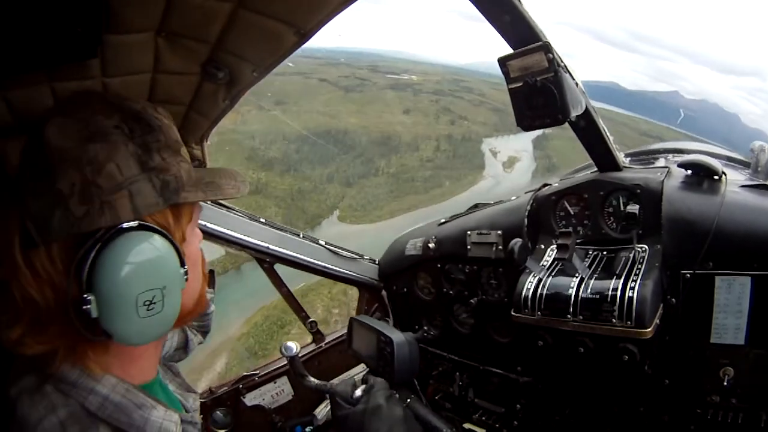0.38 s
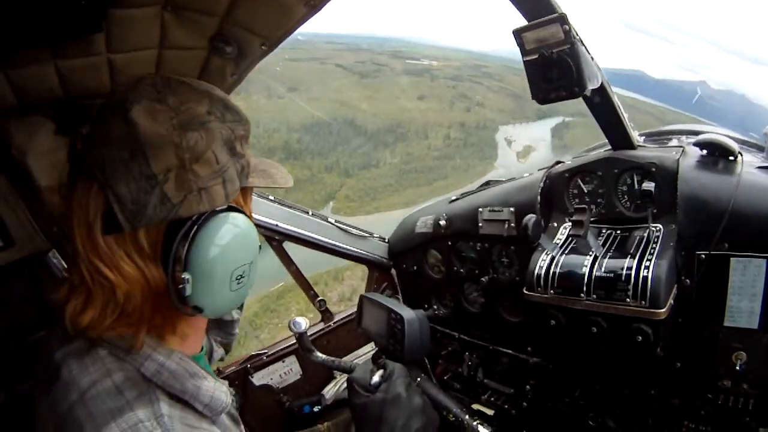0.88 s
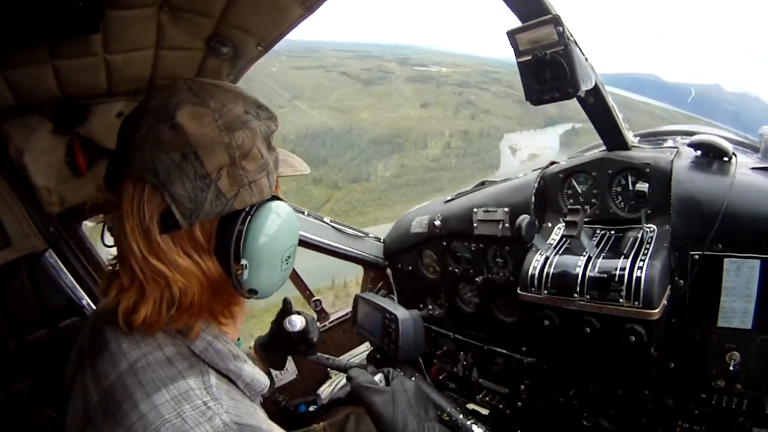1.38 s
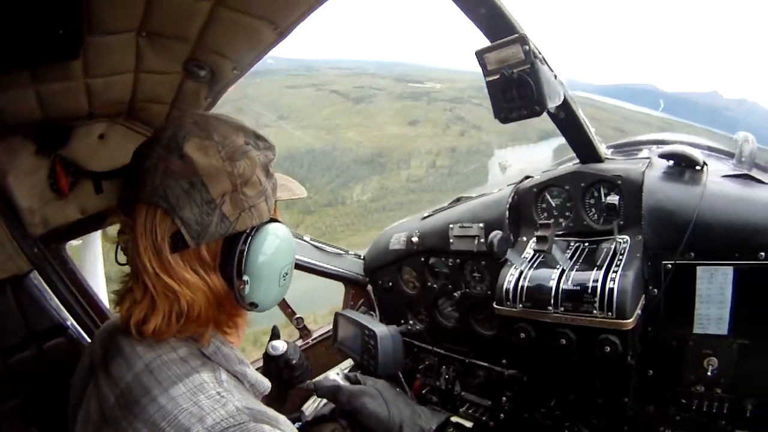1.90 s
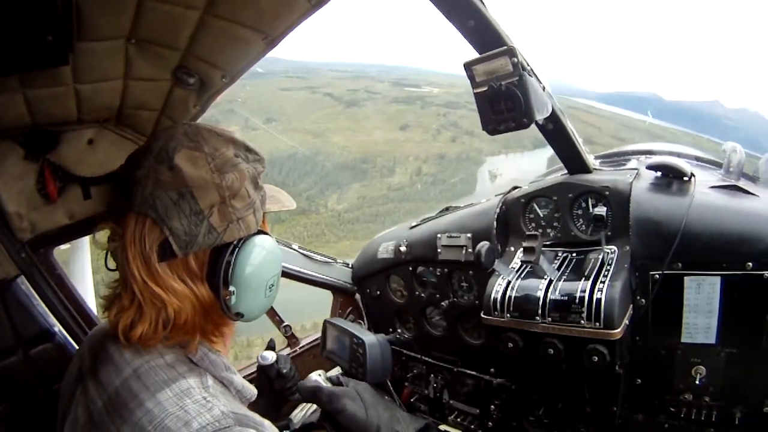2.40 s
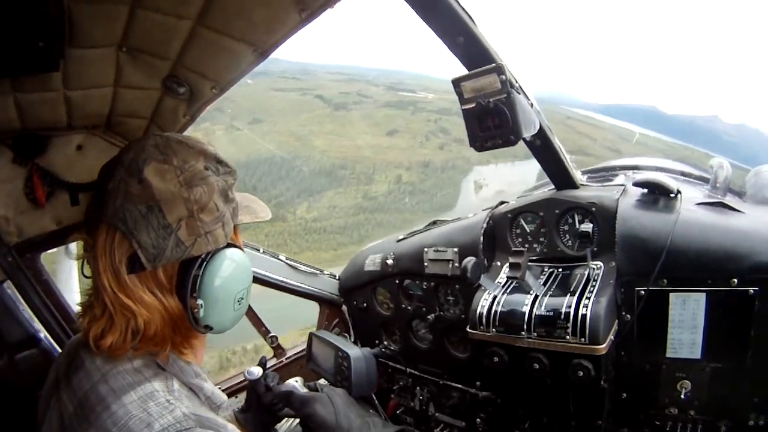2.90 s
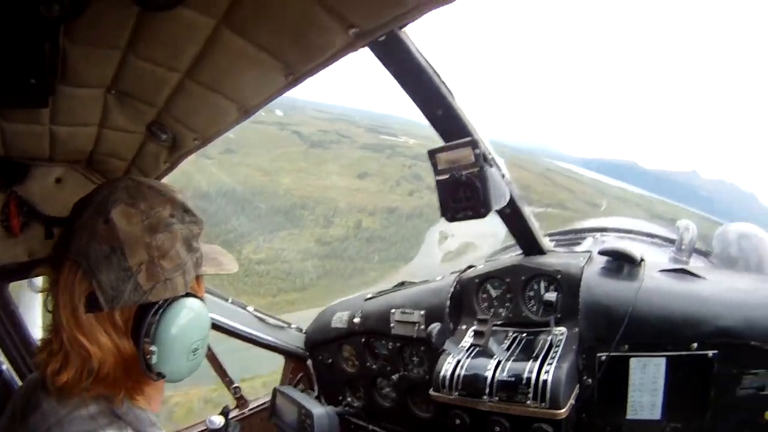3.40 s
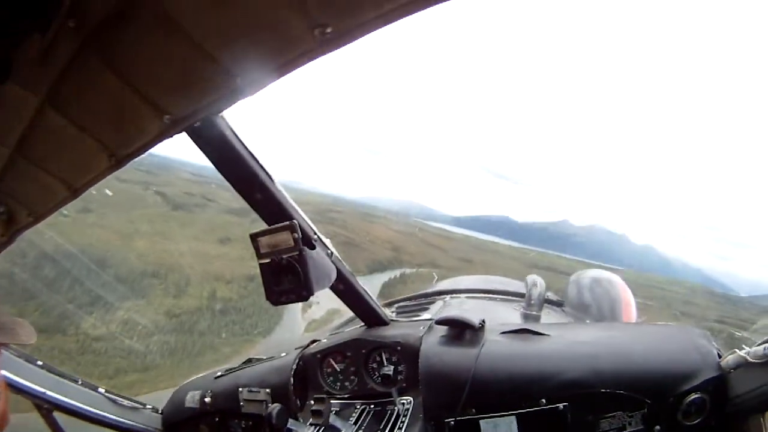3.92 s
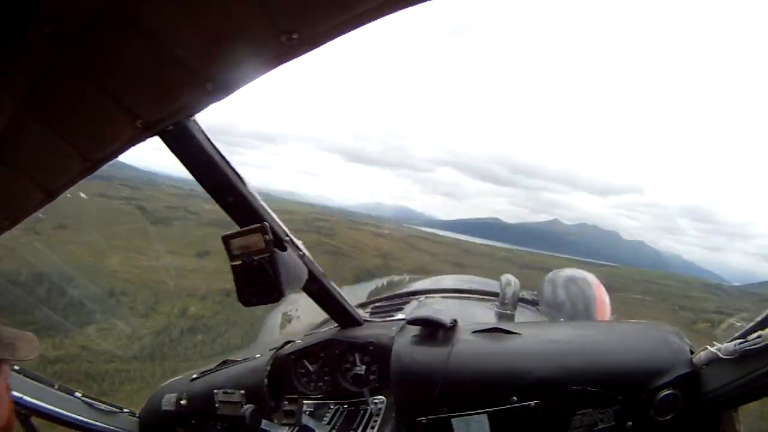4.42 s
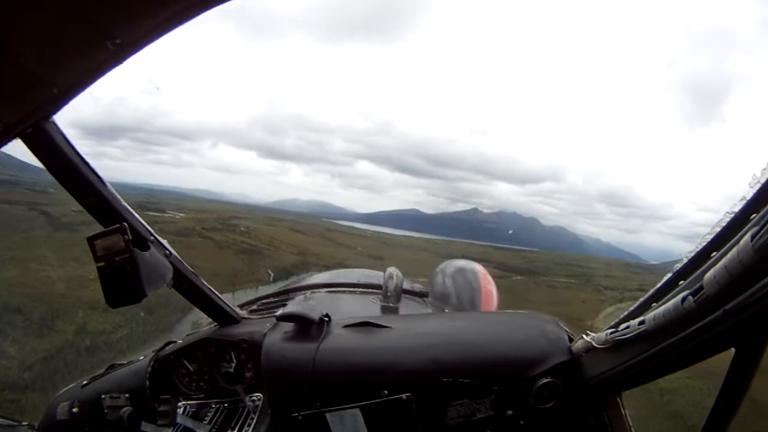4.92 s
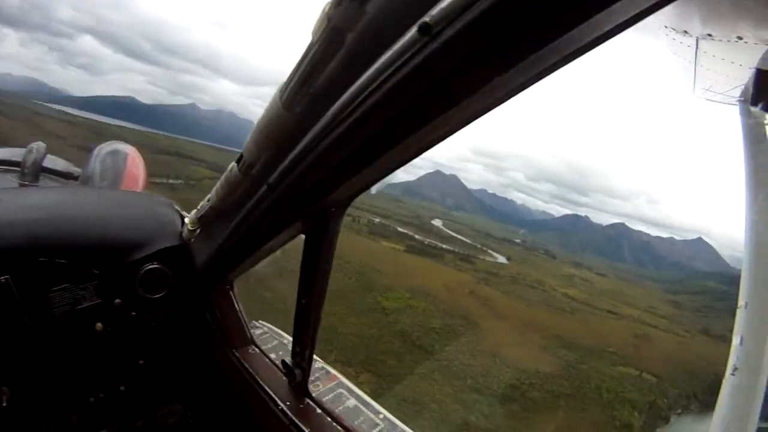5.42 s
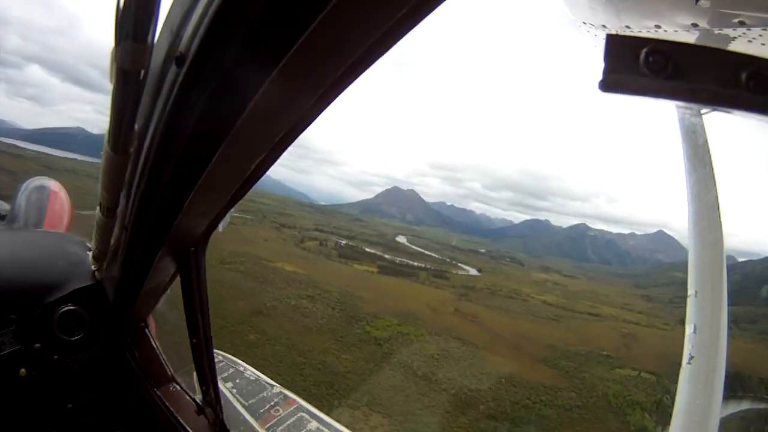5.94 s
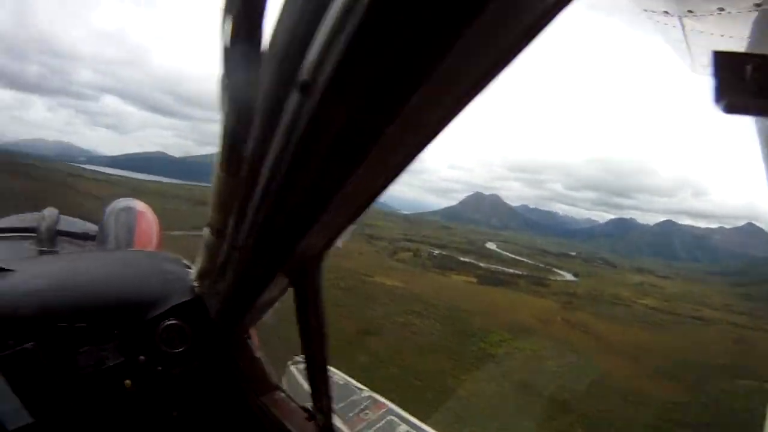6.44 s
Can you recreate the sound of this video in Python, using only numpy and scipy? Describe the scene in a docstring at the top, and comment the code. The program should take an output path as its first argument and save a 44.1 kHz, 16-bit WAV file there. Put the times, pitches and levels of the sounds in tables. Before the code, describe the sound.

Inside a small propeller plane at cruise, a rough throbbing engine roar continues under rushing air, its tone brightening as the microphone turns.

```python
"""Radial engine aircraft cabin

A nine-cylinder radial engine and its two-blade propeller drone at cruise: pulses ring in a small cabin.
Thin whines come from gears and valves, and noise makes the rumble and hiss of air past the hull.
The camera turns from the seat past the panel to the side window, which changes the balance of the sounds.
The recorder samples slowly and holds each sample, so the sound is mirrored into the treble."""
import sys
import numpy as np
from scipy import signal
from scipy.fft import rfft, irfft, next_fast_len
from scipy.io import wavfile
from scipy.ndimage import uniform_filter1d, map_coordinates

SR = 44100
rng = np.random.default_rng(int(sys.argv[2]) if len(sys.argv) > 2 else 0)


def digitize_waveform(pressure):
    """Quantize a signal to 16-bit integers and store it at the path in sys.argv[1].

    Rows of a 2-D input are taken as channels; values are limited to [-1, 1].
    """
    field = np.atleast_2d(pressure).T
    bounded = np.clip(field, -1, 1)
    quanta = np.round(bounded * 32767).astype(np.int16)
    wavfile.write(sys.argv[1], SR, quanta)


def invert_db(x):
    """Field ratio 10**(x/20) for x, a level in decibels (scalar or array-like)."""
    u = np.asarray(x, float) / 20
    return 10 ** u


N = 289296

# How fast the engine runs. Each row: time in seconds, four-stroke cycles per second in Hz.
ENGINE_SPEED = [(0.0, 15.493), (1.0, 15.47), (3.4, 15.566), (4.6, 15.554), (5.2, 15.568), (5.8, 15.611),
                (6.56, 15.595)]


def curves(rows):
    """Draw straight lines between the rows: one value per sample for each column after the time."""
    seconds, *columns = np.transpose(rows)
    return [np.interp(np.arange(N) / SR, seconds, column) for column in columns]


def wobble(rate):
    """A smooth random curve with rate knots a second."""
    knots = rng.standard_normal(int(N * rate / SR) + 4)
    return map_coordinates(knots, [np.arange(N) * rate / SR])


def direction():
    """Where the camera points: 0 seat, 1 panel, 2 window."""
    # The turn of the camera. Each row: time in seconds, direction (held at 2 once past the window).
    camera_turn = [(0, 0), (2.8, 0.064), (3.6, 0.28), (4.7, 1.12), (5.1, 1.28), (5.6, 1.6), (6.56, 2.2)]
    return np.clip(curves(camera_turn)[0], 0, 2)


def facing(*ways):
    """Cross-fade as the camera turns from seat to panel to window."""
    turn = direction()
    return sum(np.clip(1 - abs(turn - i), 0, 1) * way for i, way in enumerate(ways))


def drone(count=28):
    """Nine uneven exhaust puffs and four blade passes a cycle, as suction pulses through the cabin modes."""
    # The cylinders in firing order. Each row: puff strength in dB, lag on the way to the cabin in ms.
    cylinders = [(0.9, 0.1), (-9.8, -1.54), (-2.4, 1.95), (0.7, -1.32), (-7.6, -3.77), (-6.3, -0.1),
                 (-9.2, -5.7), (-0.3, -1.47), (2.9, -3.45)]
    puff_db, lag_ms = np.transpose(cylinders)
    rate = curves(ENGINE_SPEED)[0]
    cycle = np.cumsum(rate) / SR + .014
    firing = np.arange(9) / 9 + lag_ms / 1000 * rate.mean()  # as fractions of a cycle
    out = np.zeros(N)
    for k in range(2, count):  # harmonics of the cycle
        hz = k * rate.mean()
        pulses = np.sum(invert_db(puff_db) * np.exp(-2j * np.pi * k * firing))
        if k % 4 == 0:  # four equal blade passes leave only every fourth harmonic
            # a short blade pulse, ahead of the first firing
            pulses += invert_db(7) * np.exp(-hz / 2220 + 1j * k * .28)
        in_cabin = facing(*[cabin(hz, column=j) for j in (2, 3, 4)])
        size = -pulses * in_cabin  # minus: suction
        # firing is never quite the same
        unsteady = invert_db(.6 + .5 * wobble(3)) * np.exp(.08j * wobble(3))
        out += np.real(size * unsteady * np.exp(2j * np.pi * k * cycle))
    return out


def cabin(hz, column):
    """Sum the resonances of the cabin air for one direction; neighbours have opposite sign."""
    # The cabin modes. Each row: centre in Hz, width in Hz,
    # then the peak response in dB facing the seat, the panel and the window.
    modes = [(65.7, 30.8, -30.3, -30.3, -29.6), (97.3, 10.0, -28.5, -30.9, -70.0),
             (137.3, 23.2, -28.9, -28.7, -29.2), (114.7, 129.7, -34.4, -32.5, -30.7),
             (227.9, 10.0, -30.7, -28.4, -27.1), (316.9, 25.9, -42.6, -41.4, -41.9),
             (360.1, 114.6, -28.0, -23.1, -20.2), (363.2, 104.0, -29.2, -23.8, -20.7)]
    response = 0
    for i, row in enumerate(modes):
        centre, width = row[:2]
        damping = 1j * hz * width
        response += (-1) ** i * invert_db(row[column]) * damping / (centre ** 2 - hz ** 2 + damping)
    return response


def whines():
    """Gears and valves whine at high multiples of the engine cycle, beside a hum; all slightly unsteady."""
    # Whines that depend on direction. Each row: multiple of the cycle (rounded to a whole number below),
    # level in dB facing the seat, level in dB at the loudest, direction of the loudest,
    # spread of direction, level in dB facing the window.
    aimed_whines = [(63, -45.5, -40.5, 1.5, 0.35, -58), (81.2, -44.5, -34.5, .6, 0.36, -51),
                    (82.5, -53, -38, 1.16, 0.31, -60)]
    # Weak whines, the same in all directions. Each row: multiple of the cycle, level in dB.
    faint_whines = [(37, -54), (41, -52), (46, -53), (49, -55), (54, -53), (57, -52), (65, -51), (72, -52)]
    # The hum: level in dB facing the seat, the panel and the window.
    hum_db = (-48.5, -57, -40)
    rate, turn = curves(ENGINE_SPEED)[0], direction()
    tones = [(517, facing(*hum_db))]  # the hum keeps to 517 Hz whatever the engine speed
    tones += [(k * rate, db) for k, db in faint_whines]
    for k, seat_db, top_db, aim, spread, window_db in aimed_whines:
        near = np.exp(-((turn - aim) / spread) ** 2)
        away_db = np.where(turn < aim, seat_db, window_db)
        tones.append((round(k) * rate, near * top_db + (1 - near) * away_db))
    out = np.zeros(N)
    for hz, db in tones:
        loudness = np.sqrt(2) * invert_db(db + 1.5 * wobble(6))
        phase = 2 * np.pi * np.cumsum(hz + .8 * wobble(9)) / SR
        out += loudness * np.sin(phase)
    return out


def airflow():
    """Buffeting booms in the hull; slipstream hiss rings in the camera case and throbs with the cycle."""
    # Slow swells of the air. Each row: time in seconds, rumble change in dB, hiss change in dB.
    swells = [(0, 3, 0), (2.4, 1, 0), (4.6, 0.9, -0.5), (5.2, 1, -0.5), (5.9, 3.5, 0.7), (6.56, 2.2, .6)]
    # Colour of the rumble before the swells. Each row: frequency in Hz,
    # then level in dB per Hz facing the seat, the panel and the window.
    rumble_colour = [(15, -68, -68, -68), (25, -61, -62, -61), (45, -57, -57.5, -57.5),
                     (70, -55, -55, -55.5), (120, -54, -53, -53), (160, -54, -52, -50.5),
                     (200, -57.5, -54.5, -52), (240, -61, -58.5, -57.5), (280, -66, -63.5, -57.5),
                     (370, -63.5, -62.5, -57.5), (500, -64.5, -66, -61), (620, -68, -70, -64.5),
                     (800, -72, -72, -76), (1200, -95, -95, -95)]
    # Resonances of the camera case, before the swells. Each row: centre in Hz, width in Hz
    # (where the power is down to a quarter), then level in dB per Hz facing the seat, panel and window.
    case_modes = [(880, 205, -63, -65, -69), (983, 100, -67, -60, -63), (1181, 328, -57, -54, -58.5),
                  (1472, 120, -63, -74, -59), (1796, 155, -61.5, -67, -60), (2057, 340, -55.5, -52, -53),
                  (2326, 353, -52, -51, -49.5), (2698, 156, -63, -56.5, -60), (2950, 140, -67.5, -66, -67),
                  (3347, 410, -57, -55, -51.5), (3721, 230, -56.5, -52, -51.5), (4030, 460, -63, -58, -59),
                  (4305, 420, -65.5, -67, -62), (4795, 610, -67, -64.5, -62.5),
                  (5263, 360, -69, -69.5, -62.5), (5690, 420, -81, -78, -77)]
    rumble_db, hiss_db = curves(swells)
    knots_hz, *ways_db = np.transpose(rumble_colour)

    def boom_gains(hz):
        return invert_db(np.array([np.interp(np.log(hz + 1), np.log(knots_hz), db) for db in ways_db]))

    def hiss_gains(hz):
        power = np.zeros((3, len(hz)))
        for centre, width, *levels_db in case_modes:
            peak = 1 / (1 + (2 * (hz - centre) / width) ** 2) ** 2  # a resonance applied twice
            power += invert_db(levels_db)[:, None] ** 2 * peak
        return np.sqrt(power)

    boom = rush(boom_gains, patchy_db=0.4)
    hiss = rush(hiss_gains, patchy_db=0.45)
    cycle = 2 * np.pi * np.cumsum(curves(ENGINE_SPEED)[0]) / SR
    throb_db = .2 * np.sin(cycle) + .25 * np.sin(4 * cycle)  # once a cycle and at the blade rate
    boom = invert_db(rumble_db + .5 * wobble(6)) * boom
    hiss = invert_db(hiss_db + throb_db + .25 * wobble(9)) * hiss
    return boom + hiss


def rush(gains, patchy_db):
    """One patchy noise coloured for each direction; gains(hz) are amplitudes per root Hz."""
    z = signal.stft(rng.standard_normal(N), nperseg=512)[2]
    # random patches, smoothed over pitch and then over time
    patches = uniform_filter1d(rng.standard_normal(z.shape), size=5, axis=0)
    patches = uniform_filter1d(patches, size=10, axis=1)
    noise = signal.istft(z * invert_db(patchy_db * patches / patches.std()), nperseg=512)[1][:N]
    m = next_fast_len(N + 8192)
    coloured = irfft(rfft(noise, m) * gains(np.fft.rfftfreq(m, 1 / SR)), m)[:, :N]
    return np.sqrt(SR / 2) * facing(*coloured)


def scene():
    """All sources at the one microphone."""
    return (drone() + whines() + airflow())[None]


def roll_off(x):
    """The treble ends steeply here."""
    return signal.sosfilt(signal.butter(12, 15800, fs=SR, output="sos"), x)


def record(dry):
    """Slow sampling, each sample held: images appear around the sampling rate, up to the band limit."""
    slow_hz, hold, top_hz = 12000, 4, 15340  # sampling rate in Hz, repeats of each sample, band limit in Hz
    slow = signal.resample(dry, round(N * slow_hz / SR), axis=1)
    held = np.repeat(slow, hold, axis=1)
    spectrum = rfft(signal.resample(held, N, axis=1))
    mix = irfft(spectrum * (np.fft.rfftfreq(N, 1 / SR) < top_hz), N)
    return roll_off(mix)


dry = scene()
out = record(dry)
digitize_waveform(out)
```